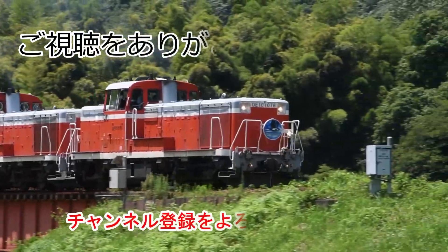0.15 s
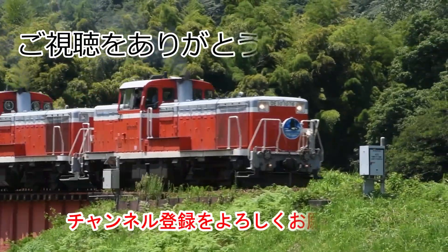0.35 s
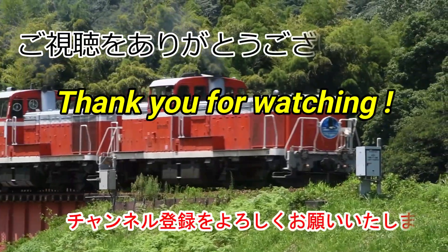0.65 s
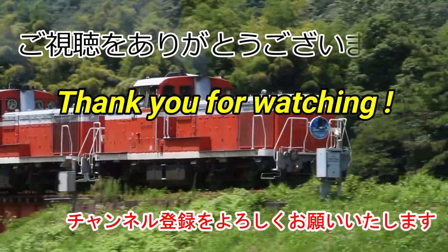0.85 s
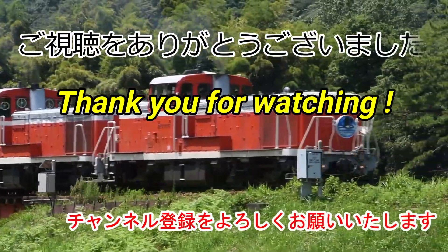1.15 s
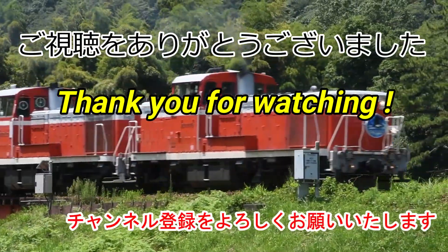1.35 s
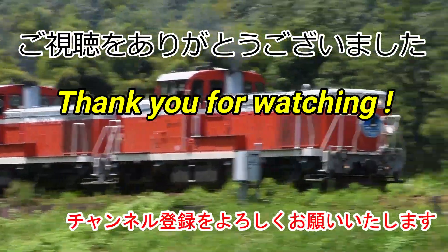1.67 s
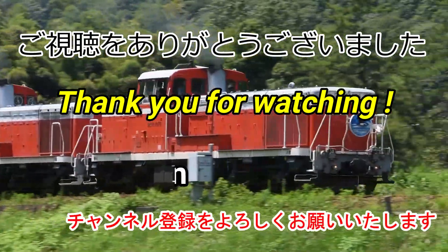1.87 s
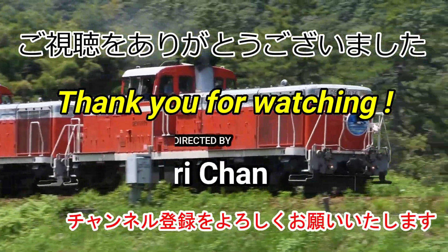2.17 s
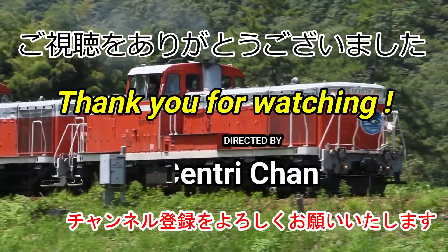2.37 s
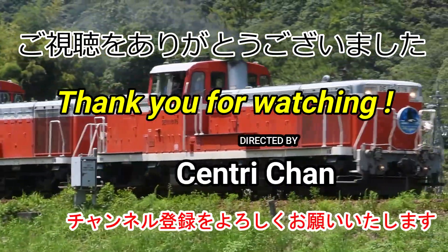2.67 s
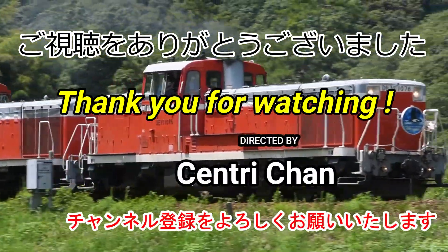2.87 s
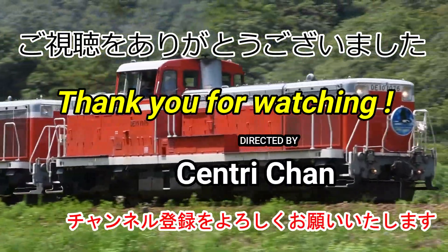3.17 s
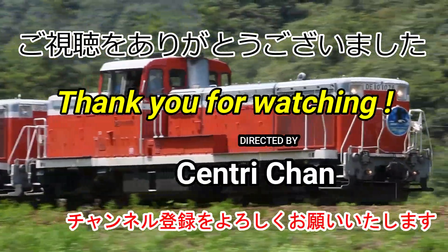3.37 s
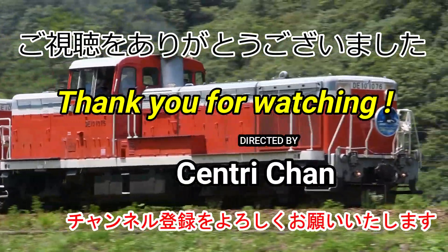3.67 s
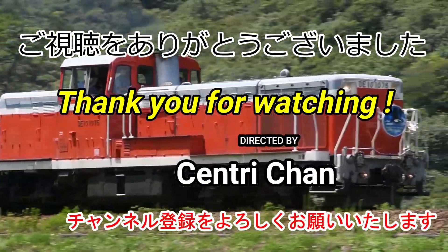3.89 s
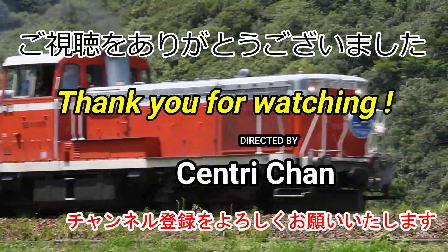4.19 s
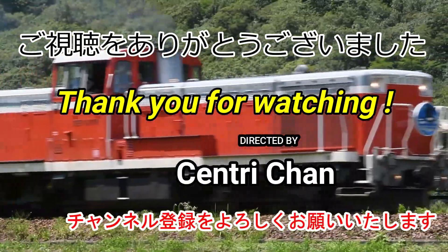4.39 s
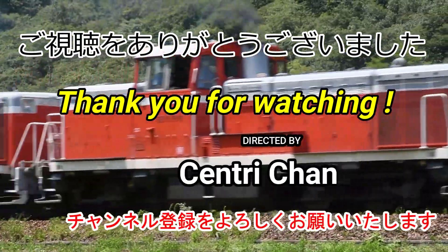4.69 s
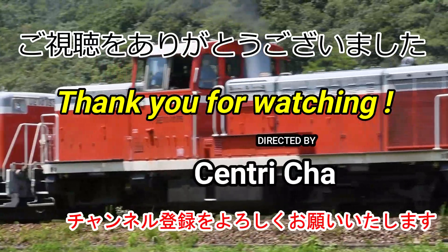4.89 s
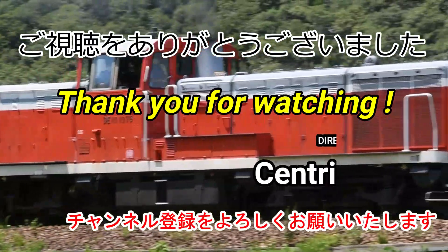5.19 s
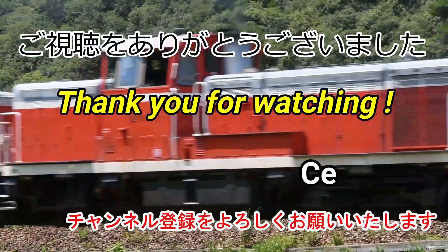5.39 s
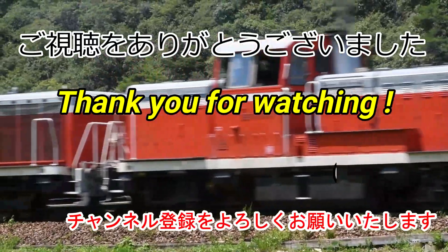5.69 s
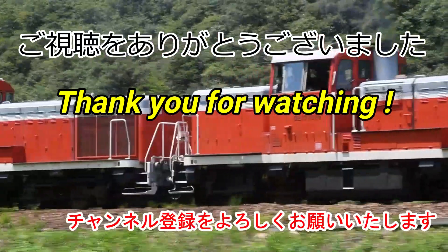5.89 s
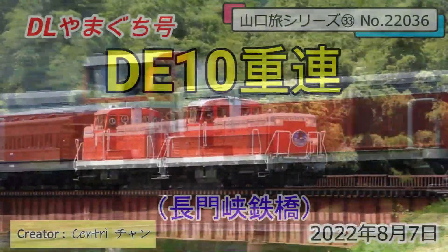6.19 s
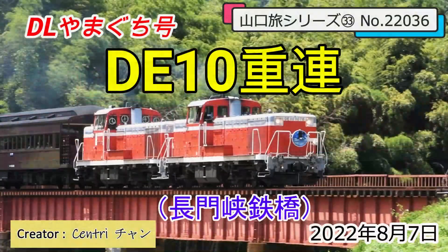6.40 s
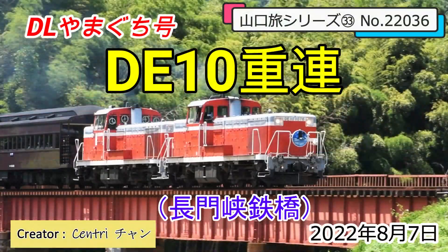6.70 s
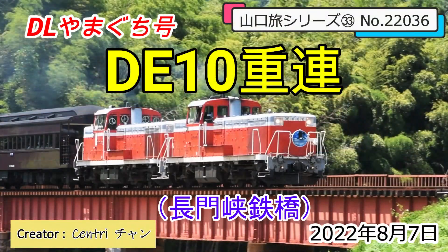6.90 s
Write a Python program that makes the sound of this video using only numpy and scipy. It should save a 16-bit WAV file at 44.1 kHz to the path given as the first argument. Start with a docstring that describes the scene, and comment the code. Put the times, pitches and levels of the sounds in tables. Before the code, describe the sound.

Outdoors beside a steel girder bridge, two diesel locomotives roll past a close stereo microphone. Irregular wheel thuds and hard metallic knocks ring briefly over a constant grainy rail roar. Small squeaks and dry clicks flicker through. The joints soften midway, then a rapidly ticking engine hiss swells as the engine comes abreast, with deeper thuds, brighter clatter and rising gear whine before a short fade.

```python
"""Wheels thud over rail joints amid rail roar as two diesel locomotives roll off a steel girder bridge.
They pass close by, gathering speed. Blows and hard knocks excite the resonant modes of the girders;
contact noise makes roar, hiss and clatter; wavering sines make gear whine, squeaks and exhaust hum.
The valve gear's ticks gate the intake hiss, which swells as the engine room comes abreast.
Two close microphone ports receive direct and scattered sound, and the sound is faded out at the end."""
import sys
import numpy as np
from scipy import signal
from scipy.fft import rfft, irfft, next_fast_len
from scipy.io import wavfile

SR = 44100
rng = np.random.default_rng(int(sys.argv[2]) if len(sys.argv) > 2 else 0)


def unload_wav(signal):
    """Save mono or channel-first audio to the path in sys.argv[1] as 16-bit WAV at rate SR, clipped to [-1, 1]."""
    wavfile.write(
        sys.argv[1],
        SR,
        np.round(np.clip(np.atleast_2d(signal).T, -1, 1) * 32767).astype(np.int16),
    )


N = 310905

# A wheel crosses a rail joint. Each row: time in seconds, relative thud level in dB, tilt of the thud
# in dB per octave, relative level of the running gear's clatter in dB, nominal length in seconds.
JOINTS = [(0.003, -22, -6, -35.5, 0.05), (0.189, -25, 0.5, -36.5, 0.087), (0.423, -32, -9, -42.5, 0.047),
          (0.609, -26.5, -2, -37.5, 0.11), (0.772, -27, 5.5, -33.5, 0.1), (0.989, -22, 1, -34, 0.077),
          (1.548, -22.5, -13, -36, 0.14), (1.755, -22.5, -0.5, -33.5, 0.097), (1.9, -27, -25, -36.5, 0.16),
          (2.223, -22.5, -2, -54, 0.1), (2.446, -26.5, 1.5, -38.5, 0.12), (3.076, -40.5, 18, -39, 0.063),
          (3.294, -45, 22.5, -32, 0.043), (3.41, -38, 11.5, -36.5, 0.12), (3.728, -29.5, 9, -48, 0.11),
          (3.947, -26, 4.5, -41, 0.11), (4.293, -19, -11, -45.5, 0.073), (4.472, -20.5, -8.5, -31, 0.053),
          (4.651, -18.5, -3.5, -34.5, 0.045), (4.767, -24.5, 1, -45.5, 0.029), (4.962, -29, 6, -33.5, 0.05),
          (5.173, -26.5, 5, -32, 0.052), (5.265, -31.5, 0.5, -37, 0.058), (5.357, -35.5, 3, -35.5, 0.18),
          (5.747, -26.5, -9, -35, 0.077), (5.902, -20.5, -6.5, -31, 0.072), (6.073, -25.5, -7, -37, 0.33)]


def girders():
    """Modal excitation: each joint's contact burst and each hard knock drive every mode of the steel."""
    # Girder modes. Each row: frequency in Hz, relative strength in dB, 60 dB decay time in seconds.
    modes = [(249, -7, 0.028), (288, -6, 0.11), (420, -1, .05), (512.4, -2.5, 0.11), (562, -1, 0.056),
             (638, 3, 0.047), (735, 4.5, 0.021), (887, 4.5, 0.011), (977, -0.5, 0.21), (1038, 1, 0.11),
             (1236, -4.5, 0.034), (1424, -1.5, 0.18), (1530, -6.5, 0.016), (1825, -19, .04)]
    # Wheel strikes rail end. Each row: time in seconds, relative peak in dB.
    hard_knocks = [(0.178, -14.5), (0.625, -14.5), (0.769, -19.5), (0.809, -11), (0.997, -14),
                   (1.007, -14.5), (1.022, -21), (1.039, -20), (1.106, -16.5), (1.548, -20), (2.231, -15),
                   (2.254, -15.5), (2.299, -17), (2.444, -24), (2.493, -18), (3.404, -24), (3.95, -16),
                   (3.975, -17.5), (4.27, -16), (4.293, -11.5), (4.322, -13.5), (4.47, -11), (4.651, -23),
                   (4.71, -15.5), (4.764, -14), (4.962, -19), (5.725, -11), (5.9, -7.5), (5.924, -14.5),
                   (6.072, -12.5)]
    # Low modes come through as the wheels draw near. Each row: time in seconds, gain in dB.
    deep_gain = [(0, -21), (0.9, -31), (2.4, -29), (3.3, -15.5), (4.4, -2.5), (5.0, -3), (6.1, -2)]
    tilt_from_hz, deep_below_hz = 600, 450
    bounce_s, bounce_loss_db = .0045, 1.5
    knock_gain_db, contact_top_hz = 4.0, 1300   # the contact pulse lasts one period of contact_top_hz

    s, level_db, tilt_db, _, length = np.transpose(JOINTS)
    landings = [
        (knock + bounce_s * k * rng.uniform(.7, 1.3), db - bounce_loss_db * k)
        for knock, db in hard_knocks for k in range(3)   # each knock lands three times
    ]
    knock_s, knock_db = np.transpose(landings)
    knock_first = (knock_s * SR).astype(int)
    # Thud peak's offset from the blow as a share of its length: after it early on, before it later.
    peak_offset_share = 0.28 - 0.083 * s
    peak_s = s + peak_offset_share * length

    shake = rng.standard_normal((2, 2, N)) * from_db(1.9 * drift(60))
    spread_db = rng.normal(0, 1.6, (len(s), len(modes)))
    struck = rng.uniform(0.51, 0.98, (len(knock_s), len(modes)))
    pulse = signal.windows.hann(int(SR / contact_top_hz))
    pulse = pulse / pulse.sum()

    out = 0
    for k, (hz, mode_db, t60) in enumerate(modes):
        if hz < deep_below_hz:
            colour_db = np.interp(s, *np.transpose(deep_gain))
            knock_colour_db = np.interp(knock_s, *np.transpose(deep_gain))
        else:
            colour_db = tilt_db * max(np.log2(hz / tilt_from_hz), 0)
            knock_colour_db = 0
        thud_db = level_db + colour_db + mode_db - 13.5 + spread_db[:, k]
        force = bumps(peak_s, thud_db, 0.55 * length, rise=0.21, hold=1.17) * shake[k % 2]
        pushes = from_db(knock_db + knock_gain_db + mode_db + knock_colour_db) * struck[:, k]
        for first, push in zip(knock_first, pushes):
            force[0, first:first + len(pulse)] += push * pulse
        out = out + ring(force, hz, t60)
    return signal.sosfilt(signal.butter(3, [200, 3000], "band", fs=SR, output="sos"), out)


def roar(roar_db):
    """Rolling contact noise: uneven broadband contacts, with random knocks that excite short resonances."""
    # Each row: frequency in Hz, relative spectrum level in dB per Hz.
    roar_colour = [(120, -38), (200, -14), (294, -6), (348, -9.5), (561, 1), (753, -4.5), (977, -1),
                   (1150, -3.5), (1330, 1.5), (1570, -8.5), (1800, -9), (3000, -26.5), (3900, -46),
                   (6600, -120)]
    contacts = noise(roar_colour, grain_db=0.7)
    pitches = np.geomspace(330, 1700, num=18)
    knocks = clanks(roar_colour, pitches, per_s=600, cycles=25, uneven_db=2.0)
    return from_db(roar_db) * (from_db(-3.0) * contacts + from_db(-6.5) * knocks)


def running_gear(hiss_db, edge_db):
    """Contact noise: a steady metallic hiss and rattle whose power rises in sudden bursts of clatter."""
    # Further bursts of clatter from the running gear, at or between the joints. Each row: time of the
    # burst's peak in seconds, relative level in dB, treble against it in dB, nominal length in seconds.
    further_bursts = [(2.08, -38.5, -1.5, 0.074), (2.163, -35.5, -4, 0.1), (2.632, -34.5, -7, .053),
                      (2.694, -39.5, 0.5, 0.075), (2.829, -36.5, -3.5, 0.073), (2.91, -36.5, 0.5, 0.042),
                      (3.63, -36.5, -2.5, 0.11), (3.807, -34.5, -22, 0.049), (4.024, -35, -18.5, 0.017),
                      (4.116, -31, -8, 0.026), (4.31, -33, -6, 0.15), (4.53, -37.5, -3, 0.055),
                      (4.6, -39, -12.5, 0.018), (4.692, -31.5, -6.5, .1)]
    # Colours of the body and of the bright edge. Each row: frequency in Hz, relative level in dB per Hz.
    body_colour = [(1060, -20.5), (1800, 0.5), (2120, -5.5), (2280, -3), (3320, -5), (4170, -3),
                   (4940, -20), (5500, -14), (7150, -22.5), (12100, -120)]
    edge_colour = [(2650, -41), (4500, 0), (5160, -7.5), (6960, -6.5), (8440, -15), (9800, -16),
                   (12700, -48.5), (21600, -120)]
    joint_treble_db = -5.5

    shaken = [(s, clatter_db, joint_treble_db, length) for s, _, _, clatter_db, length in JOINTS]
    s, level_db, treble_db, length = np.transpose(shaken + further_bursts)
    body_bursts = bumps(s, level_db, length, rise=0.08, hold=3.8)
    edge_bursts = bumps(s, level_db + treble_db, length, rise=0.033, hold=2.5)
    body = np.hypot(from_db(hiss_db), body_bursts)   # hypot adds powers
    edge = np.hypot(from_db(edge_db), edge_bursts)
    pitches = np.geomspace(1800, 5500, num=24)
    knocks = clanks(body_colour, pitches, per_s=700, cycles=230, uneven_db=3.0)
    rattle = noise(body_colour, grain_db=1.0) + from_db(-7.5) * knocks
    return body * rattle + edge * noise(edge_colour, grain_db=1.0)


def gears():
    """Tooth-meshing tones climb with speed; frequency and amplitude modulation make them ragged and broken."""
    # Each row: time in seconds, nominal leading tooth rate in Hz, then relative levels in dB of the
    # leading drive, the trailing drive and the shaft hum.
    whine = [(0, 1216, -48, -42.5, -61.5), (1.5, 1272, -43.5, -47.5, -53), (1.8, 1285, -41.5, -64, -51),
             (2.6, 1305, -43, -50, -52), (3.2, 1313, -67.5, -46, -47.5), (4.0, 1330, -38, -46.5, -48.5),
             (4.3, 1340, -37, -46, -51.5), (4.6, 1350, -35, -40.5, -51.5), (4.75, 1352, -41.5, -38, -41),
             (5.0, 1358, -39.5, -37, -49.5), (5.15, 1366, -49, -46.5, -48.5), (5.27, 1365, -42.5, -43, -35),
             (5.36, 1368, -41, -46, -40.5), (5.7, 1380, -42, -45, -43), (5.9, 1390, -37, -45.5, -45),
             (6.2, 1395, -38.5, -47, -42.5)]
    ratios = [1, 1.1, .2735]   # leading drive, trailing drive, shaft: pitch against the leading tooth rate
    wavers = [.011, .018, .018]

    hz, *levels_db = in_time(whine)
    out = 0
    for ratio, level_db, waver in zip(ratios, levels_db, wavers):
        error = .3 * drift(8) + drift(50)   # slow wander and fast tooth-to-tooth error
        phase = 2 * np.pi * np.cumsum(ratio * hz * (1 + waver * error)) / SR
        gate = np.clip(.75 + .4 * drift(25), 0, 1.3)   # drop-outs
        out = out + from_db(level_db + 9.0) * gate * np.sin(phase)
    return out * [[1], [0]]   # direct sound only


def engine():
    """Amplitude modulation: valve-gear ticks gate the intake hiss in one pattern repeated every cycle."""
    # Hidden, half in view, abreast. Each row: time in seconds, level in dB.
    room_level = [(0, -71), (2.8, -70), (3.1, -48.5), (4.05, -44.5), (4.15, -35.5), (6.3, -34.5)]
    # Each row: frequency in Hz, relative spectrum level in dB per Hz.
    intake_colour = [(1760, -40), (3000, -23.5), (4210, -5), (4860, -3), (6150, -3.5), (7880, -4.5),
                     (9760, -10), (12900, -21), (15600, -28.5)]
    # Place of each tick as a share of the engine cycle.
    tick_turns = [.012, .225, .395, .428, .622, .715, .803, .835]
    # Nominal strength of each tick in dB.
    tick_levels = [-7, -1, 1.5, -1.5, -0.5, -2.5, 0.5, -14]
    cycle_hz, cycle_start_s = 10.29, 5.2

    room_db, = in_time(room_level)
    turn = (np.arange(N) / SR - cycle_start_s) * cycle_hz
    ticks = 0
    for start, tick_db in zip(tick_turns, tick_levels):
        since_s = (turn - start) % 1 / cycle_hz
        stroke = np.floor(turn - start).astype(int)
        uneven_db = 2 * rng.standard_normal(200)   # strokes vary in strength
        ticks = ticks + from_db(tick_db + uneven_db)[stroke] * np.exp(-since_s / 0.0043)
    gate = rms_one(np.hypot(.55, ticks))
    return from_db(room_db) * gate * noise(intake_colour, grain_db=1.0)


def clicks(table, low_hz, high_hz, length_s):
    """Impulsive excitation: a one-sample snap and a short noise burst pass through a frequency band."""
    s, peak_db = np.transpose(table)
    burst = bumps(s, peak_db - 12.0, length_s + 0 * s, rise=0.31, hold=0.8) * rng.standard_normal((2, N))
    burst[0, (s * SR).astype(int)] += from_db(peak_db + 4.0)
    return signal.sosfilt(signal.butter(2, [low_hz, high_hz], "band", fs=SR, output="sos"), burst)


def squeaks():
    """Frictional slip: steel slips on steel and one part sings briefly with a ragged amplitude."""
    # Each row: time of the peak in seconds, pitch in Hz, relative level in dB, nominal length in seconds.
    slips = [(0.424, 4400, -31, 0.006), (0.574, 3180, -32, 0.005), (0.658, 4150, -33, .009),
             (0.766, 4100, -31, 0.008), (1.117, 4560, -32, .005), (1.952, 4290, -35, 0.02),
             (1.974, 4220, -33.5, 0.03), (2.03, 3650, -36, 0.012), (2.075, 3750, -33, 0.012),
             (2.7, 5830, -40, 0.02), (2.87, 6050, -36, 0.007), (2.915, 6200, -39, 0.015),
             (2.93, 5600, -39, 0.015), (3.074, 2270, -28, 0.007), (5.628, 3920, -34, .01),
             (5.765, 4000, -30, 0.011)]
    t = np.arange(N) / SR
    out = 0
    for s, hz, db, length in slips:
        out = out + bumps([s], [db], [length], rise=0.32, hold=2) * np.sin(2 * np.pi * hz * t)
    return out * (.8 + .6 * drift(400)) * [[1], [0]]


def exhaust(rumble_db):
    """Low-frequency noise: the exhaust rumbles as coloured noise with an uneven grain."""
    # Each row: frequency in Hz, relative spectrum level in dB per Hz.
    rumble_colour = [(20, -65), (32, -40.5), (59, -1.5), (114, 1), (156, 1.5), (250, -6), (320, -30),
                     (550, -120)]
    return from_db(rumble_db) * noise(rumble_colour, grain_db=2.0)


def hum():
    """Modulated tones: faint exhaust hum wavers slowly in both frequency and level."""
    # Each row: nominal frequency in Hz, relative level in dB.
    firing = [(118, -62), (185, -61)]
    out = 0
    for hz, db in firing:
        level = from_db(db + 3.0 + 2.0 * drift(3.6))
        phase = 2 * np.pi * np.cumsum(hz * (1 + 0.013 * drift(2.83))) / SR
        out = out + level * np.sin(phase)
    return out * [[1], [0]]


def air():
    """Stationary noise: a faint far hiss keeps a constant mean level."""
    # Each row: frequency in Hz, relative spectrum level in dB per Hz.
    air_colour = [(6000, -7.5), (9000, -1.5), (11000, -11), (15700, -16)]
    return from_db(-53) * noise(air_colour, grain_db=1.0)


def ports(sound):
    """Two-point coherence: direct sound is shared, the right a little later; scatter decorrelates."""
    # Each row: frequency in Hz, left-right likeness from 0 to 1.
    likeness = [(60, 0.94), (300, 0.86), (700, 0.85), (1400, 0.94), (3000, 0.82), (5000, 0.89), (8000, 1),
                (15000, 0.34)]
    # Each row: frequency in Hz, left minus right in dB.
    left_more = [(60, 6.5), (180, 3.5), (550, 4.5), (1200, 0), (2400, 1.5), (4400, -1), (8000, 1),
                 (15000, 0.6)]
    port_lag_s = 3.6e-5

    size = next_fast_len(N)
    hz = np.arange(size // 2 + 1) * SR / size
    direct, scattered = rfft(sound, size)
    alike = np.clip(at_hz(likeness, hz), 0, 1)
    direct = direct * np.sqrt((1 + alike) / 2)
    scattered = scattered * np.sqrt((1 - alike) / 2)
    tilt = from_db(at_hz(left_more, hz) / 2)   # half the difference to each side
    late = np.exp(-2j * np.pi * hz * port_lag_s)
    left = (direct + scattered) * tilt
    right = (direct - scattered) / tilt * late
    return irfft([left, right], size)[:, :N]


def ring(force, hz, t60):
    """Damped resonance: a two-pole filter answers as one mode of a steel part."""
    r, w = from_db(-60 / (t60 * SR)), 2 * np.pi * hz / SR
    feed = np.sqrt(1 - r) * np.array([1, 0, -1])
    return signal.lfilter(feed, [1, -2 * r * np.cos(w), r * r], force + 1e-18)


def clanks(spectrum, pitches, per_s, cycles, uneven_db):
    """Random impact excitation: each knock rings one randomly dealt pitch for a set number of cycles."""
    strength = from_db(uneven_db * np.minimum(rng.exponential(1, N), 3))
    knocks = (rng.random(N) < per_s / SR) * strength * rng.choice([-1, 1], N)
    dealt = rng.integers(0, len(pitches), N)
    rings = 0
    for k, hz in enumerate(pitches):
        rings = rings + from_db(at_hz(spectrum, hz)) * ring(knocks * (dealt == k), hz, cycles / hz)
    return rms_one(rings) * [[1.4], [0]]


def noise(spectrum, grain_db):
    """Spectral shaping: direct and scattered noise share a colour; slow chance makes contacts uneven."""
    size = next_fast_len(N)
    contacts = rng.standard_normal((2, N)) * from_db(grain_db * drift(110))
    gain = from_db(at_hz(spectrum, np.arange(size // 2 + 1) * SR / size))
    return rms_one(irfft(rfft(contacts, size) * gain, size)[:, :N])


def bumps(times, levels_db, lengths, rise, hold):
    """Energy addition: swells rise quickly to a peak and die away (hold 1 at once, 2 after a plateau)."""
    power = np.zeros(N)
    for s, level_db, length in zip(times, levels_db, lengths):
        first = max(int((s - .1) * SR), 0)
        t = (np.arange(first, min(first + SR // 2, N)) / SR - s) / length
        shape = np.where(t < 0, np.exp(-(t / rise) ** 2), np.exp(-np.abs(t) ** hold))
        power[first:first + len(t)] += from_db(level_db) ** 2 * shape
    return np.sqrt(power)


def drift(rate):
    """Low-pass random process: slow chance of spread 1, with its corner near the rate in Hz."""
    step = 40   # samples between drawn values
    r = np.exp(-2 * np.pi * rate * step / SR)
    chance = rng.standard_normal(N // step + 2002)
    slow = signal.lfilter([1], [1, -2 * r, r * r], chance)[2000:]   # settled part
    return np.interp(np.arange(N) / step, np.arange(len(slow)), rms_one(slow))


def from_db(db):
    """Logarithmic level: 20 dB is a tenfold amplitude."""
    return 10 ** (np.asarray(db) / 20)


def rms_one(x):
    """Normalisation of effective amplitude: the root mean square becomes 1."""
    return x / np.sqrt(np.mean(x ** 2) + 1e-20)


def in_time(rows):
    """Linear interpolation in time: each column of a table is read at every sample."""
    s, *columns = np.transpose(rows)
    return [np.interp(np.arange(N) / SR, s, c) for c in columns]


def at_hz(points, hz):
    """Logarithmic frequency scale: a spectrum table is interpolated between its points."""
    point_hz, value = np.transpose(points)
    return np.interp(np.log(hz + 1), np.log(point_hz), value)


def scene():
    """Linear superposition: the sources of the passing train add before they reach the two ports."""
    # Rolling. Each row: time in seconds, then levels in dB of the rail roar, the running gear's hiss,
    # the exhaust rumble and the bright edge of the hiss.
    rolling = [(0.0, -30.5, -41, -53, -51), (1.7, -29.5, -39.5, -49, -48), (3.0, -29, -39, -51.5, -48.5),
               (4.3, -27.5, -34, -50, -48.5), (6.2, -27.5, -33, -49.5, -44.5)]
    # Broad metallic clanks, sharp dry clicks close by, faint high ticks.
    # Each row: time in seconds, relative peak in dB.
    broad_clanks = [(0.4229, -29), (0.7667, -21), (1.7644, -23), (2.8644, -24), (2.9094, -24),
                    (3.0724, -15.5), (3.2944, -29), (4.6394, -13.5), (4.9624, -21)]
    dry_clicks = [(0.1244, -17), (0.575, -8.5), (1.1169, -12), (4.172, -9)]
    high_ticks = [(0.0712, -31), (0.1236, -25), (0.1625, -32), (0.6649, -33), (0.7138, -31), (0.9033, -33),
                  (1.2141, -31), (2.0742, -33), (2.3111, -32)]

    roar_db, hiss_db, rumble_db, edge_db = in_time(rolling)
    wheels = girders() + roar(roar_db) + running_gear(hiss_db, edge_db) + gears() + squeaks()
    impacts = clicks(broad_clanks, 1700, 5000, .004)
    impacts = impacts + clicks(dry_clicks, 2400, 9500, .0008)
    impacts = impacts + clicks(high_ticks, 9500, 15000, .0005)
    return ports(wheels + engine() + impacts + exhaust(rumble_db) + hum() + air())


def record(dry):
    """Gain and band limiting: a small level drop leads into a curved fade; a low-pass cuts the top."""
    fade_start_s, fade_end_s, fade_drop_db, fade_power = 6.184, 6.504, -2, 1.8
    cutoff_hz = 15760
    left = np.clip((fade_end_s - np.arange(N) / SR) / (fade_end_s - fade_start_s), 0, 1)
    drop = from_db(fade_drop_db * np.clip(20 * (1 - left), 0, 1))   # over the fade's first twentieth
    fade = left ** fade_power * drop
    return signal.sosfilt(signal.ellip(12, .5, 70, cutoff_hz, fs=SR, output="sos"), dry * fade)


dry = scene()
out = record(dry)
unload_wav(out)
```